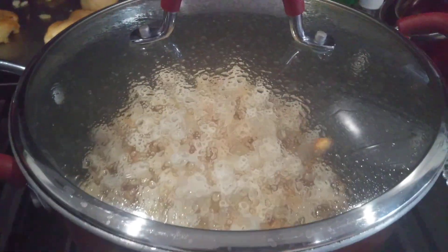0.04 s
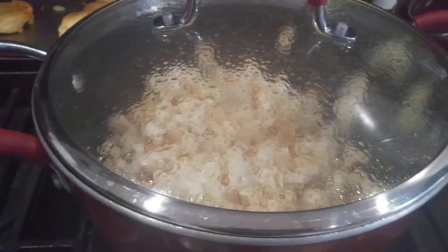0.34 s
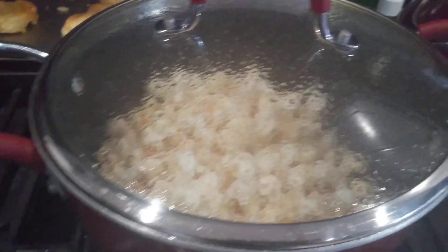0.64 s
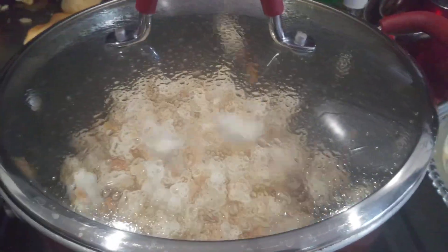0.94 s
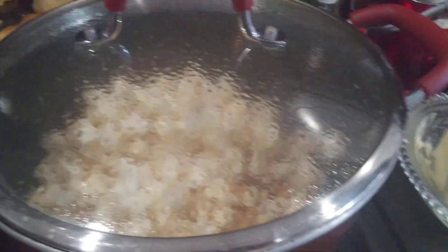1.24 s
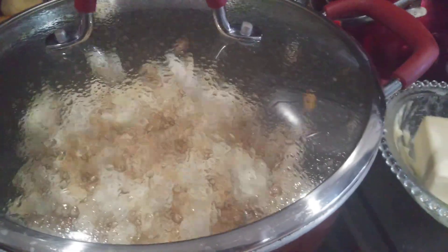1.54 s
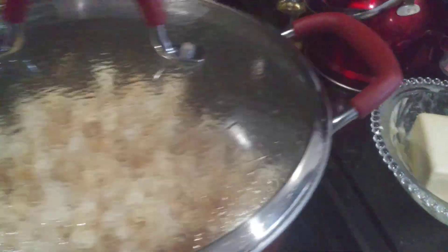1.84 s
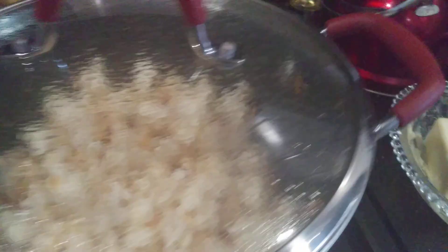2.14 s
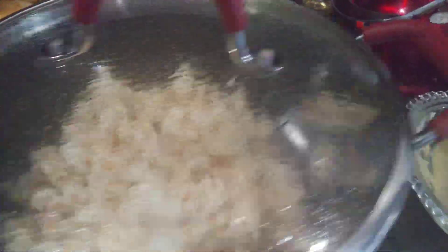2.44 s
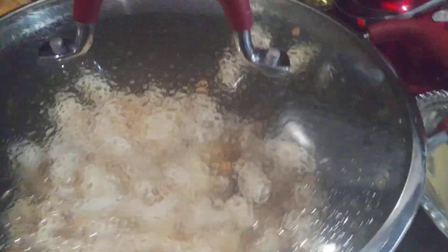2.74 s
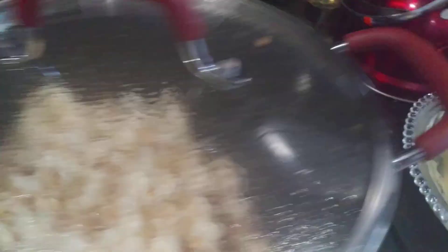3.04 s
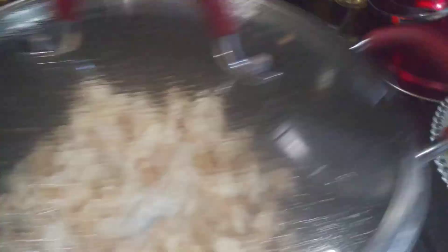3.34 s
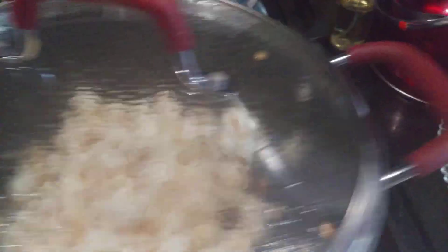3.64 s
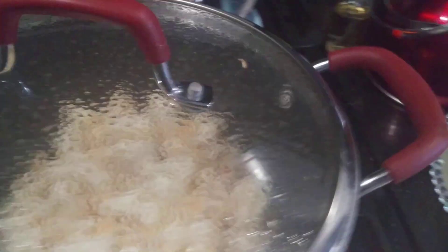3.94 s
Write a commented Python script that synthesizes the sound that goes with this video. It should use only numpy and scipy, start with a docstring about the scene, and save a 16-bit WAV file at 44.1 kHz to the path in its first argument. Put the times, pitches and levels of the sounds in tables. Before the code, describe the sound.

Popcorn pops unevenly in a steel pot, close by in a small kitchen, with sharp cracks, small hollow thumps and kernels ticking against the glass lid over a faint sizzle. From about 1.8 seconds the pot is shaken over the stove grate, scraping and rattling until the end at 4 seconds. One pop puffs steam at 2 seconds, the last comes near 2.5, and three short clanks follow after 3.

```python
"""Popcorn ticks and pops in a steel pot under a glass lid, heard from close above in a small kitchen.
Each hull cracks open and its steam thumps the air in the pot; flung kernels strike wall and lid over a
faint sizzle of oil, and one pop puffs steam out past the lid. Then the pot is shaken to and fro,
juddering and clanking over the stove grate, while the last kernels go off."""
import sys
import numpy as np
from scipy import signal
from scipy.fft import rfft, irfft, next_fast_len
from scipy.io import wavfile
from scipy.ndimage import uniform_filter1d, minimum_filter1d

SR = 44100
rng = np.random.default_rng(int(sys.argv[2]) if len(sys.argv) > 2 else 0)


def to_wav(sig):
    """Store sig (one row per channel, or 1-D mono) as 16-bit WAV at the path in sys.argv[1].

    Samples outside -1..1 are clipped; the rate is SR.
    """
    pcm = np.clip(np.atleast_2d(sig), -1, 1) * 32767
    pcm = np.round(pcm).astype(np.int16)
    wavfile.write(sys.argv[1], SR, pcm.T)  # frames by channels


N = 176400
T = np.arange(N) / SR
AGE = T[:SR // 3]  # time since a hit [s]

# kernels bursting (time [s], relative crack [dB], relative thump [dB], relative air ring [dB])
KERNEL_POPS = [(0.1605, -15, -34, -34), (0.192, -19.5, -35, -32), (0.227, -18, -23.5, -46),
               (0.3187, -13.5, -26, -31.5), (0.433, -25, -36, -36.5), (0.848, -30.5, -40, -52),
               (0.8882, -19, -39, -37.5), (0.914, -16.5, -36, -41), (0.9567, -8.5, -22.5, -25),
               (1.0004, -9, -24.5, -29), (1.1364, -19.5, -31, -32), (1.4592, -19.5, -30, -33.5),
               (1.594, -12, -18.5, -26), (2.0088, -13, -18.5, -21.5), (2.121, -9, -35, -21),
               (2.441, -7.5, -18, -27.5)]
# kernels and husks hitting wall and lid (time [s], relative ring [dB], centre [Hz], relative click [dB])
KERNEL_HITS = [(0.016, -20.5, 4270, -52), (0.279, -8, 3260, -17), (0.325, -15.5, 2850, -4),
               (0.3965, -14.5, 3270, -19), (0.4626, -18.5, 4670, -25), (0.4886, -36, 4900, -15),
               (0.6037, -20.5, 5100, -9), (0.621, -29, 5100, -24), (0.9903, -6, 3450, -23),
               (1.0013, -19, 2700, -2.5), (1.0317, -6.5, 3080, -24), (1.231, -14, 4730, -12.5),
               (1.4001, -19, 6760, -16), (1.493, -15.5, 4280, -48), (1.615, -5.5, 4800, -16),
               (1.642, -7.5, 2700, -13), (1.6833, -9.5, 3620, -31), (1.7622, -15, 6400, -8),
               (1.917, -11, 6100, -0.5), (1.956, -5, 2650, -20), (2.0467, -5.5, 2980, -6),
               (2.4581, 0.5, 3640, -5.5), (2.4803, -2, 2870, -14), (2.7534, -30, 2130, -6),
               (3.208, -2.5, 3360, -6), (3.634, -7, 6040, -6.5), (3.753, -9, 3270, 1)]
# shoves of the pot over the grate (time [s], rise [s], hold [s], level [dB])
POT_SHOVES = [(1.825, 0.008, 0.022, -12), (2.059, 0.012, 0.0026, -20.5), (2.171, 0.0071, 0.028, -12.5),
              (2.318, 0.024, 0.031, -20.5), (2.509, 0.0073, 0.031, -12), (2.634, 0.068, 0.027, -17),
              (2.845, 0.0015, 0.077, -13), (2.997, 0.026, 0.075, -18.5), (3.132, 0.028, 0.023, -17.5),
              (3.2, 0.0057, 0.042, -15.5), (3.338, 0.0095, 0.027, -17.5), (3.398, 0.0081, 0.029, -14),
              (3.508, 0.0049, 0.017, -14), (3.554, 0.0065, 0.068, -16), (3.688, 0.067, 0.022, -16.5),
              (3.878, 0.007, 0.052, -13)]
# the pot catching on a bar of the grate (time [s], pitch [Hz], level [dB])
BAR_CATCHES = [(3.156, 1750, -15.5), (3.516, 1200, -8.5), (3.887, 2406, -7.5)]
# modes of the pot on the grate (frequency [Hz])
CLATTER_MODES = [346, 447, 732, 1039, 1213, 1650, 2107]
# low body of the juddering pot (frequency [Hz], gain [dB])
JUDDER_EQ = [(50, -39.5), (120, -9.5), (250, -2.5), (600, -3), (1200, -6.5), (2200, -12.5), (5000, -28.5)]
# bright scrape of grit under the base (frequency [Hz], gain [dB])
GRIT_EQ = [(500, -33), (1500, -11.5), (3300, 4.5), (5200, -2.5), (6600, -3), (8000, -12), (16000, -10)]
# snap of a splitting hull (frequency [Hz], gain [dB])
CRACK_EQ = [(150, 11.5), (600, 12), (2500, -1), (6000, -24), (10000, 4.5), (16000, 39)]
# bed of burner rush and oil fizz (frequency [Hz], gain [dB])
SIZZLE_EQ = [(30, -22), (140, 0), (600, 2), (1800, -5), (3600, -11), (6500, -13.5), (9000, -10),
             (16000, -13.5)]
# microphone response with its port resonance (frequency [Hz], gain [dB])
MICROPHONE_EQ = [(25, -26), (85, 2), (7900, 0), (8800, 8), (9600, 4), (10400, -7.5), (12200, -19.5),
                 (15800, -19)]
# treble loss of the kitchen's reverb (frequency [Hz], gain [dB])
ROOM_EQ = [(9000, -0.5), (13000, -4.5)]

THUMP_HZ, THUMP_T60_S, AIR_HZ, AIR_T60_S = 214, 0.061, 1230, 0.086  # modes of the air in the pot
THUMP_TRIM_DB, AIR_TRIM_DB, CRACK_TRIM_DB = 6, 4.5, -3.5
THUMP_RISE_S, CRACK_S, CRACK_TAIL_S = 0.00087, 0.001, 0.014
LID_HZ, LID_OCTAVES, LID_T60_S = 4530, 0.085, 0.065  # the strongest cluster of lid modes
RING_S, RING_OCTAVES = 0.0028, 0.58
CLICK_S, CLICK_HZ, CLICK_OCTAVES = 0.0026, 11050, 0.31
RING_TRIM_DB, LID_TRIM_DB, CLICK_TRIM_DB = -8, -17.5, -5.5
SLIDE_FROM_S, SLIDE_RISE_S, SLIDE_DB = 1.623, 0.27, -33.5
RELEASE_S, DOUBLE_GRIT_DB = 0.042, -9.5  # a shove at this level starts with up to double grit
SPITS_PER_S, SLIPS_PER_S, KNOCKS_PER_S, BOUNCES_PER_S = 93, 350, 34, 80
CORN_SEND_DB, POT_SEND_DB = -6.5, -10.5  # reverb sends


def undb(db):
    """Decibels to amplitude."""
    return 10 ** (np.asarray(db) / 20)


def unit(x):
    """Scale to rms 1."""
    return x / np.sqrt(np.mean(x ** 2))


def add(out, s, x):
    """Mix a sound in at s seconds."""
    i = int(s * SR)
    out[i:i + len(x)] += x[:N - i]


def colour(x, points):
    """Minimum-phase EQ through (frequency [Hz], gain [dB]) points."""
    size = next_fast_len(len(x) + 4096)
    hz, db = np.array(points, float).T
    f = np.maximum(np.fft.rfftfreq(size, 1 / SR), 1)
    gain = undb(np.interp(np.log(f), np.log(hz), db))
    cepstrum = irfft(np.log(gain), size)
    cepstrum[1:size // 2] *= 2
    cepstrum[size // 2 + 1:] = 0
    return irfft(rfft(x, size) * np.exp(rfft(cepstrum)), size)[:len(x)]


def bell(f, hz, octaves):
    """Bell curve around a centre frequency."""
    return 1 / (1 + (np.log2(np.maximum(f, 1) / hz) / octaves) ** 4) ** .5


def band_noise(hz, octaves):
    """A short stretch of noise around a centre, rms 1."""
    f = np.fft.rfftfreq(len(AGE), 1 / SR)
    return unit(irfft(rfft(rng.standard_normal(len(AGE))) * bell(f, hz, octaves), len(AGE)))


def burst(noise, envelope):
    """Noise under an envelope, with the energy of that envelope."""
    x = noise * envelope
    return x * np.sqrt(np.sum(envelope ** 2) / np.sum(x ** 2))


def fade(t60):
    """Envelope that falls 60 dB in t60 seconds."""
    return np.exp(-np.log(1000) * AGE / t60)


def mode(hz, t60):
    """One fading vibration."""
    return np.sin(2 * np.pi * hz * AGE) * fade(t60)


def through(x, impulse):
    """Convolve with an impulse response scaled to energy 1."""
    return signal.fftconvolve(x, impulse / np.sqrt(np.sum(impulse ** 2)))[:N]


def uneven_times(rate):
    """Moments at a mean rate per second, each anywhere within its slot."""
    count = int(rate * N / SR)
    return (np.arange(count) + rng.random(count)) / rate


def kitchen(x, t60=0.38, build_s=0.00097):
    """Short diffuse reverb, dull at the very top."""
    tail = rng.standard_normal(len(AGE)) * fade(t60) * (1 - np.exp(-AGE / build_s))
    return through(x, colour(tail, ROOM_EQ))


def sizzle():
    """The burner rushes; droplets of hot oil fizz and spit under the lid and keep the pot ringing."""
    spits = np.zeros(N)
    for s in uneven_times(SPITS_PER_S):
        add(spits, s, undb(6 * rng.standard_normal()) * np.exp(-AGE / CRACK_S))
    crackle = unit(np.diff(spits * rng.standard_normal(N), prepend=0))
    pot_ring = unit(through(rng.standard_normal(N), mode(hz=2700, t60=0.016)))
    bed = unit(colour(rng.standard_normal(N), SIZZLE_EQ))
    return undb(-50.5) * bed + undb(-57) * crackle + undb(-55) * pot_ring


def rasp(force, slips, eq, decay_s):
    """Each slip of the base leaves a brief grain of noise, louder under more force."""
    pole = np.exp(-2 / (decay_s * SR))
    grains = np.sqrt(signal.lfilter([1 - pole], [1, -pole], slips))
    body = colour(signal.unit_impulse(len(AGE)), eq)
    return through(force * grains * rng.standard_normal(N), body)


def knocks(effort):
    """The pot rocks on the grate: a clattering thud at the peak of every shove, and more in between."""
    out = np.zeros(N)
    peaks = [s + rise for s, rise, _, _ in POT_SHOVES]
    for s in peaks + list(uneven_times(KNOCKS_PER_S)):
        size, detune = rng.standard_normal(2)
        # every point of contact rings its own mix of modes
        clatter = sum(rng.standard_normal() * mode(hz, t60=0.08) for hz in CLATTER_MODES)
        thud = mode(hz=237 * (1 + 0.077 * detune), t60=0.063)
        level = effort[int(s * SR)] * undb(-12 + 7 * np.tanh(size))
        add(out, s, level * (thud + undb(-7.5) * clatter))
    return out


def shaking():
    """The base sticks and slips on the grate: the pot judders, grinds grit and rocks; flakes rustle."""
    power = (np.clip((T - SLIDE_FROM_S) / SLIDE_RISE_S, 0, 1) * undb(SLIDE_DB)) ** 2
    bite = np.zeros(N)  # the base grinds hardest as it breaks loose
    for s, rise, hold, db in POT_SHOVES:
        release = np.exp(-np.maximum(T - s - rise - hold, 0) / RELEASE_S)
        push = np.clip((T - s) / rise, 0, 1) * release
        power += (push * undb(db)) ** 2
        bite += push * undb(db - DOUBLE_GRIT_DB) * np.exp(-np.abs(T - s) / RELEASE_S)
    force = np.sqrt(power)
    effort = force / force.max()
    slips = (rng.random(N) < SLIPS_PER_S / SR) * undb(2.5 * rng.standard_normal(N)) ** 2
    slips /= uniform_filter1d(slips, size=900) + 1e-6  # even out the energy over about 20 ms
    judder = rasp(force, slips, JUDDER_EQ, decay_s=0.0067)
    grit = rasp(force * (1 + bite), slips, GRIT_EQ, decay_s=0.0073)
    rustle = effort ** .5 * unit(np.diff(rng.standard_normal(N), prepend=0))
    return judder + undb(-7.5) * grit + knocks(effort) + undb(-26.5) * rustle


def clanks():
    """The base catches on a bar and one mode of the pot rings out."""
    out = np.zeros(N)
    for s, hz, db in BAR_CATCHES:
        add(out, s, undb(db) * mode(hz, t60=0.083))
    return out


def bounces(settle_s=0.09):
    """Flakes stirred up by each pop fall back with small ticks."""
    out = np.zeros(N)
    stir = sum((T > s) * undb(db) ** 2 * np.exp(-np.abs(T - s) / settle_s) for s, db, _, _ in KERNEL_POPS)
    for s in uneven_times(BOUNCES_PER_S):
        hz = rng.choice(np.geomspace(3111, 8800, 7))
        tick = band_noise(hz, RING_OCTAVES) * np.exp(-AGE / RING_S)
        level = np.sqrt(stir[int(s * SR)]) * undb(-22 + 9.6 * rng.standard_normal())
        add(out, s, level * tick)
    return out


def steam_puff(at_s=2.008, rise_s=0.0082, fall_s=0.029):
    """One pop blows a jet of steam out past the lid: a low push of air and a short hiss."""
    out = np.zeros(N)
    swell = np.minimum(AGE / rise_s, 1) * np.exp(-np.maximum(AGE - rise_s, 0) / fall_s)
    hiss = burst(band_noise(CLICK_HZ, CLICK_OCTAVES), swell)
    add(out, at_s, undb(-9.5) * mode(hz=60.7, t60=0.07) + undb(-9) * hiss)
    return out


def ticks():
    """A flung kernel hits: a hard click, its own short ring, and lid modes that vary with the spot."""
    out = np.zeros(N)
    for s, ring_db, hz, click_db in KERNEL_HITS:
        spot_modes = band_noise(hz, LID_OCTAVES)
        main_modes = bell(LID_HZ, hz, RING_OCTAVES) * band_noise(LID_HZ, LID_OCTAVES)
        lid = undb(LID_TRIM_DB) * burst(spot_modes + main_modes, fade(LID_T60_S))
        ring = undb(RING_TRIM_DB) * burst(band_noise(hz, RING_OCTAVES), np.exp(-AGE / RING_S))
        click = undb(CLICK_TRIM_DB) * burst(band_noise(CLICK_HZ, CLICK_OCTAVES), np.exp(-AGE / CLICK_S))
        add(out, s, undb(ring_db) * (ring + lid) + undb(click_db) * click)
    return out


def pops():
    """The hull cracks, the starch rustles open, and steam thumps and rings the air under the lid."""
    bursts, rings = np.zeros(N), np.zeros(N)
    attack = 1 - np.exp(-AGE / THUMP_RISE_S)
    for s, crack_db, thump_db, air_db in KERNEL_POPS:
        thump_detune, air_detune = 1 + 0.016 * rng.standard_normal(2)
        thump_gain, air_gain = undb(THUMP_TRIM_DB + thump_db), undb(AIR_TRIM_DB + air_db)
        thump = attack * mode(THUMP_HZ * thump_detune, THUMP_T60_S)
        air_ring = mode(AIR_HZ * air_detune, AIR_T60_S)
        add(rings, s, air_gain * air_ring - thump_gain * thump)
        low_steam = burst(band_noise(THUMP_HZ, octaves=0.79), attack * np.exp(-AGE / 0.027))
        mid_steam = burst(band_noise(AIR_HZ, octaves=0.86), np.exp(-AGE / 0.014))
        steam = 0.25 * thump_gain * low_steam + 0.56 * air_gain * mid_steam
        crack = burst(colour(rng.standard_normal(len(AGE)), CRACK_EQ), np.exp(-AGE / CRACK_S))
        starch = burst(band_noise(hz=4730, octaves=1.0), np.exp(-AGE / CRACK_TAIL_S))
        add(bursts, s, steam + undb(CRACK_TRIM_DB + crack_db) * (crack + undb(-5) * starch))
    return bursts, rings


def scene():
    """Corn and pot feed the kitchen reverb; the sizzle and the air ringing under the lid stay dry."""
    bursts, air_rings = pops()
    corn = bursts + ticks() + steam_puff() + bounces()
    pot = shaking() + clanks()
    room = kitchen(undb(CORN_SEND_DB) * corn + undb(POT_SEND_DB) * pot)
    return (room + sizzle() + pot + air_rings + corn)[None]


def record(dry):
    """The microphone port rings in the high treble; a fast limiter holds the peaks; the top is cut."""
    ceiling, window, top_hz = 0.99, 177, 15900  # the window spans 4 ms
    x = colour(dry[0], MICROPHONE_EQ)
    gain = ceiling / np.maximum(np.abs(x), ceiling)
    gain = uniform_filter1d(minimum_filter1d(gain, window), window)
    high_cut = signal.ellip(10, .2, 85, top_hz, fs=SR, output="sos")
    return signal.sosfilt(high_cut, x * gain)[None]


dry = scene()
out = record(dry)
to_wav(out)
```